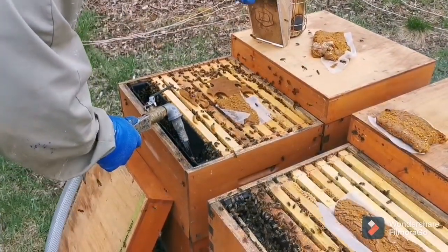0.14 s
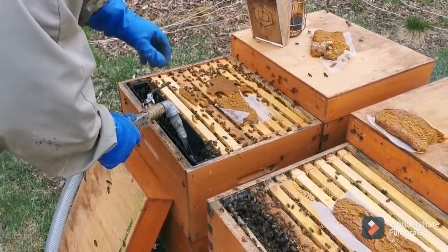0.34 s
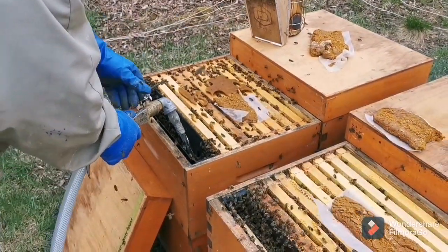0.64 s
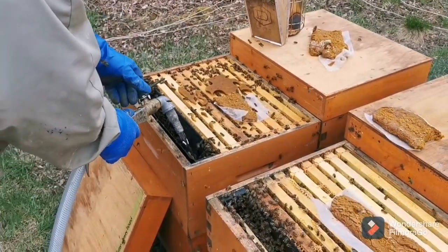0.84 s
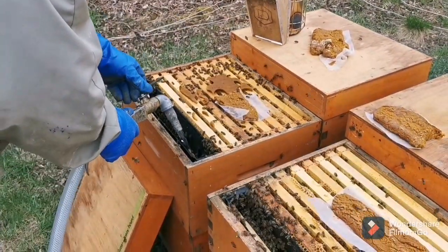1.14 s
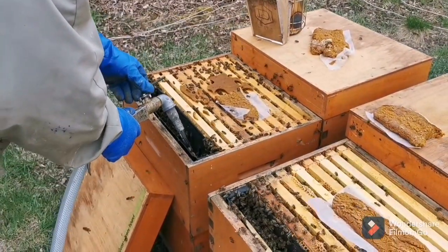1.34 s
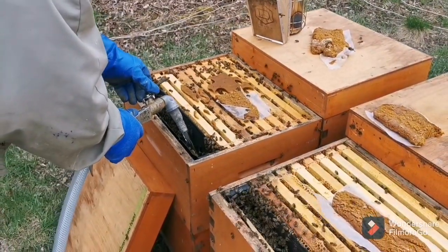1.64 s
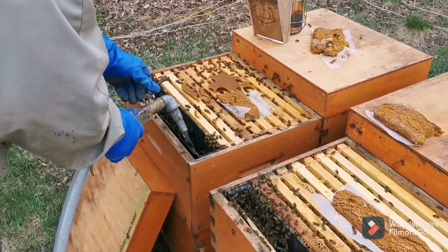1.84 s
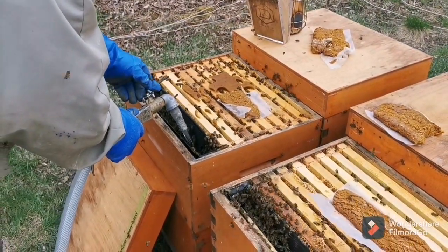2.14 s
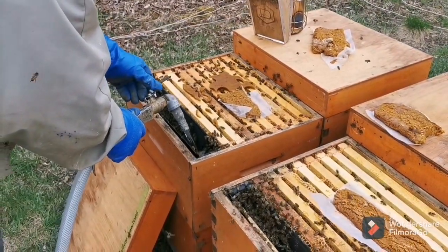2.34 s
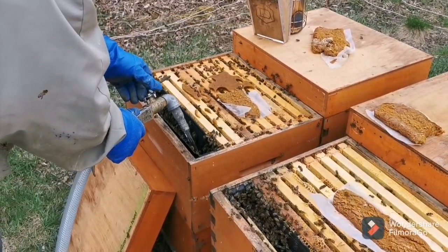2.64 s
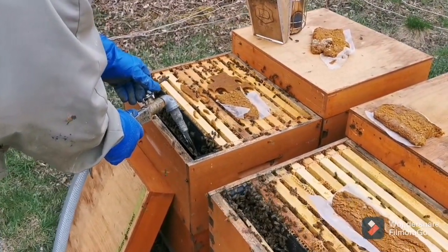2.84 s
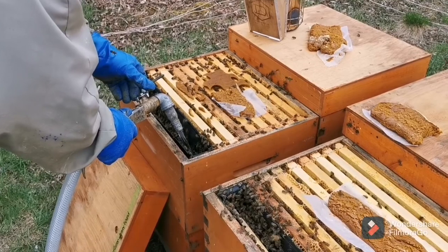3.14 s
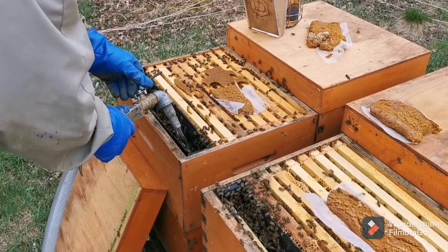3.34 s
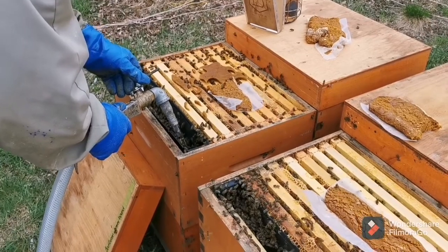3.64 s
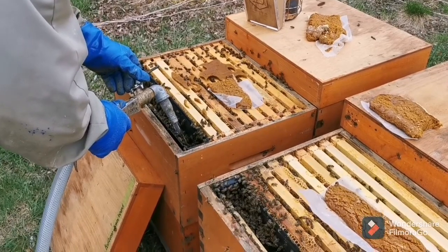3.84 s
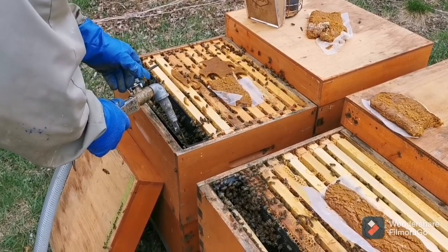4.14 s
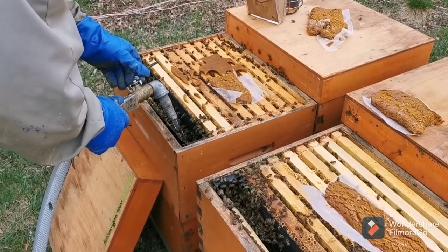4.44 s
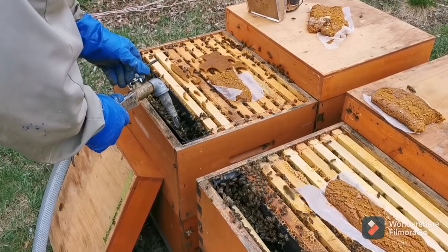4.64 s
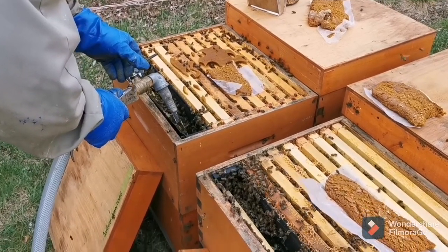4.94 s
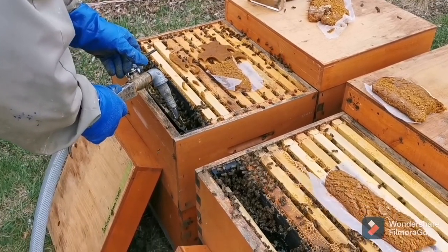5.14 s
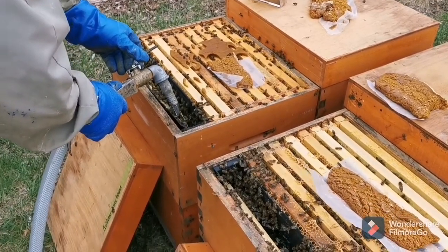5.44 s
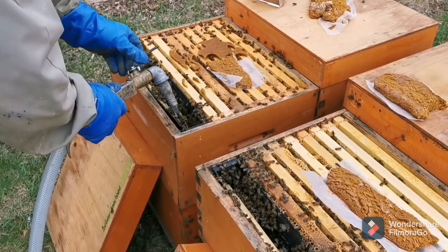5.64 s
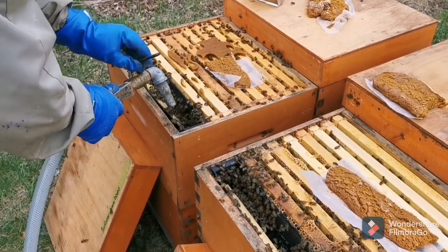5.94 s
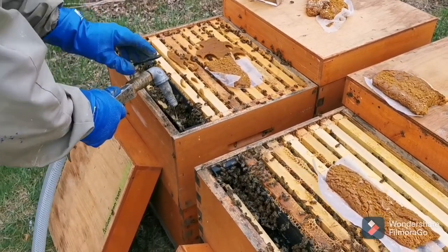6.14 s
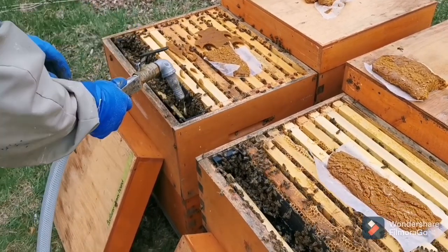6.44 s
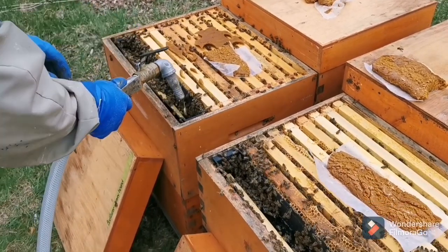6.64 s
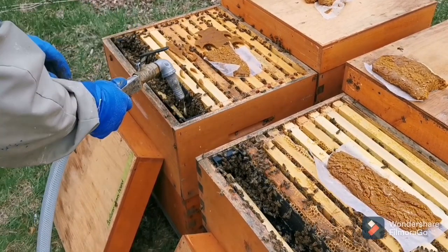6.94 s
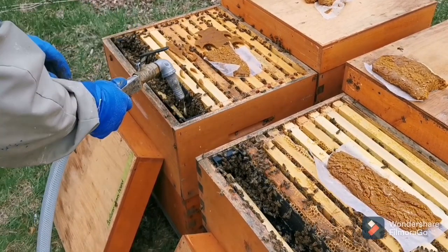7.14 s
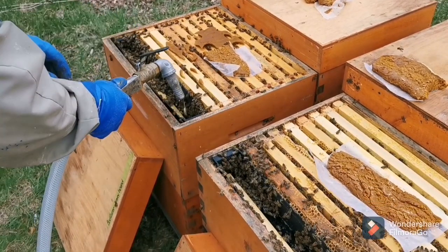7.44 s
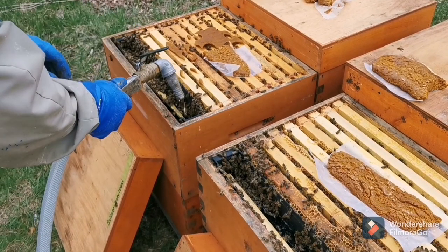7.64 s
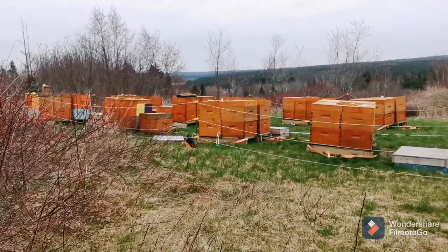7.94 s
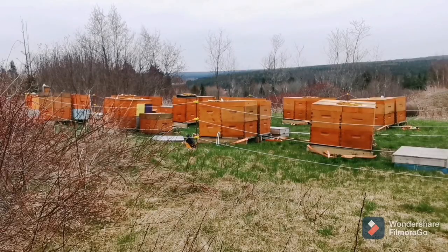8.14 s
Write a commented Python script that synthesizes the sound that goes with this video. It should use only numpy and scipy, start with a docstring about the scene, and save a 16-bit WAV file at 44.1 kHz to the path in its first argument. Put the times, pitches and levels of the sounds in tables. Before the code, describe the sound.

Outdoors at beehives, a small engine-driven syrup pump runs at an even, rapid chug, with low exhaust throb, metallic clatter and bright hiss. A rubber glove brushes fabric at the start, and soft knocks and a scuff on a hollow wooden box come after a second. Wind buffets the stereo microphone throughout. The engine cuts off dead near the end; after a short gap comes faint open air with tiny rustles and ticks.

```python
"""Out in the open, a small four-stroke engine chugs steadily as it pumps syrup through a hose into a beehive.
Its exhaust throbs as a sum of sine waves, its parts clack as struck resonances, and its air hisses as shaped noise.
A wooden hive box is knocked, a rubber glove brushes a sleeve, and wind noise buffets the two microphone ports.
The sound cuts off abruptly; after a gap, a cut with a low step on the left opens a very quiet field with light
rustles, ticks and one faint arching whistle, a sine wave whose pitch rises and falls."""
import sys
import numpy as np
from scipy import signal
from scipy.fft import rfft, irfft, next_fast_len
from scipy.io import wavfile
from scipy.ndimage import uniform_filter1d

SR = 44100
rng = np.random.default_rng(int(sys.argv[2]) if len(sys.argv) > 2 else 0)


def master(y):
    """Save y as 16-bit WAV."""
    cut = np.clip(np.atleast_2d(y).T, -1, 1)
    pcm = np.round(cut * 32767)  # scale
    wavfile.write(sys.argv[1], SR, pcm.astype(np.int16))


N = 365588
TIME = np.arange(N) / SR
STOP_S, RESUME_S = 7.761, 8.056  # the hive stops, the field begins
PORT_LAG_S = .00049  # how much later sound from the right reaches the left port
STROKE_RISE_SHARE = 0.48  # part of a glove stroke's or rustle's length spent building up


def from_db(db):
    """Turn decibels into a gain."""
    return 10 ** (np.asarray(db) / 20)


def rms_one(x):
    """Scale to an average strength (rms) of 1."""
    return x / np.sqrt(np.mean(x ** 2) + 1e-20)


def read(rows, at):
    """Read the columns of a table, joined by straight lines."""
    where, *columns = np.transpose(rows)
    return np.array([np.interp(at, where, column) for column in columns])


def colour(x, spectrum):
    """Give sound a left and a right balance of low and high pitches, then scale the pair to rms 1."""
    hz, *sides = np.transpose(spectrum)
    size = next_fast_len(N)
    log_hz = np.log(np.arange(size // 2 + 1) * SR / size + 1)
    # outside the table the level falls 30 dB for every factor e (2.72) in frequency
    above = np.maximum(log_hz - np.log(hz[-1]), 0)
    below = np.maximum(np.log(hz[0]) - log_hz, 0)
    sides_db = [np.interp(log_hz, np.log(hz), side) - 30 * (above + below) for side in sides]
    shaped = irfft(rfft(x, size) * from_db(sides_db), size)
    return rms_one(shaped[:, :N])


def from_right(x, lag_s=PORT_LAG_S):
    """Sound from the right reaches the left port later."""
    return np.array([np.interp(TIME - lag_s, TIME, x), x])


def clicks(times, gains):
    """Place blows one sample long at the given times."""
    out = np.full(N, 1e-18)
    places = np.round(np.asarray(times) * SR).astype(int)
    np.add.at(out, np.clip(places, 0, N - 1), gains)
    return out


def resonate(x, hz, width_hz):
    """Let a part favour one pitch, with gain 1 at the top of the resonance."""
    r = np.exp(-np.pi * width_hz / SR)
    feedback = [1, -2 * r * np.cos(2 * np.pi * hz / SR), r * r]
    return signal.lfilter(np.array([1, 0, -1]) * (1 - r * r) / 2, feedback, x)


def ring(x, hz, t60):
    """A click sets off a sine wave that dies away by 60 dB in t60 seconds."""
    r = np.exp(-np.log(1000) / (t60 * SR))
    w = 2 * np.pi * hz / SR
    return signal.lfilter([0, np.sin(w)], [1, -2 * r * np.cos(w), r * r], x)


def crackle(blows, t60):
    """Each blow sets off a burst of noise that dies away by 60 dB in t60 seconds."""
    r = np.exp(-np.log(1000) / (t60 * SR))
    return signal.lfilter([1], [1, -r], np.abs(blows)) * rng.standard_normal(N)


def swell(peak_s, length_s, rise_share):
    """Rise smoothly to 1 and fall smoothly; the length runs between the points 4.3 dB below the peak."""
    side_s = length_s * np.where(TIME < peak_s, rise_share, 1 - rise_share)
    return np.exp(-.5 * np.minimum(((TIME - peak_s) / side_s) ** 2, 100))


# colour of the still air: (frequency [Hz], relative left level [dB], relative right level [dB])
FIELD_COLOUR = [(30, 2, -9), (150, -9, -19), (500, -18, -19), (2010, -24, -20), (5030, -31, -29),
                (9000, -33, -27), (15000, -43, -27)]


def still_air(level_db=-69.5):
    """The quiet field is faint steady noise, separate on each side."""
    return from_db(level_db) * colour(rng.standard_normal((2, N)), FIELD_COLOUR)


def cut_step(step_db=-44.0, fade_s=0.053):
    """The cut into the field leaves a low step on the left, which sinks back to zero."""
    step = np.exp(-np.abs(TIME - RESUME_S) / fade_s)
    return -from_db(step_db) * step * np.array([[1], [0]])


# light rustles in the field: (time of the peak [s], length [s], level at the peak [dB])
RUSTLES = [(8.114, 0.02, -74), (8.255, .075, -73.5)]


def rustles(hz=8500, width_hz=7000):
    """Bright noise swells and fades in light rustles."""
    strength = sum(from_db(db) * swell(s, length_s, STROKE_RISE_SHARE) for s, length_s, db in RUSTLES)
    return strength * rms_one(resonate(rng.standard_normal((2, N)), hz, width_hz))


def whistle(top_hz=1650, sag_hz=457, level_db=-69.5, top_change_db=-6):
    """One thin sine wave rises quickly, falls more slowly and fades; its level dips around the highest pitch."""
    start_s, top_s, end_s, attack_s, fade_s = 8.063, 8.107, 8.172, .005, .035
    along = np.interp(TIME, [start_s, top_s, end_s], [-1, 0, 1])
    arch = np.cos(np.pi / 2 * along)
    hz = top_hz - sag_hz * (1 - arch)
    rise = np.clip((TIME - start_s) / attack_s, 0, 1)
    fade = np.clip((end_s - TIME) / fade_s, 0, 1)
    tone = np.sin(2 * np.pi * np.cumsum(hz) / SR)
    return rise * fade * from_db(level_db + top_change_db * arch ** 2) * tone


def field():
    """All that is heard in the quiet field, apart from the ticks."""
    return still_air() + cut_step() + rustles() + whistle()


# light ticks: (time [s], strength of the blow [dB], pitch [Hz])
TICKS = [(2.433, -43, 11000), (4.339, -48, 8520), (8.058, -54, 7200), (8.089, -62, 10000),
         (8.161, -54, 13000)]


def ticks(width_hz=4000):
    """Tiny dry ticks: very short bursts of noise, each around its own pitch."""
    return sum(resonate(crackle(clicks([s], from_db(db)), t60=0.0083), hz, width_hz) for s, db, hz in TICKS)


# the breeze on the two microphone ports: (time [s], left level [dB], right level [dB])
BREEZE = [(0.0, -49, -45), (0.3, -54, -51), (0.8, -56.5, -56), (1.4, -45.5, -43), (1.7, -40, -26.5),
          (2.0, -54, -30), (2.3, -45, -43.5), (2.7, -47, -35.5), (3.05, -48, -51), (3.6, -42, -32.5),
          (4.05, -45, -44), (4.55, -42, -51), (5.0, -57, -59), (5.45, -38, -39.5), (5.9, -41, -38.5),
          (6.2, -44, -45), (6.7, -42, -35.5), (7.74, -36, -39.5)]
# short gusts that puff across the ports: (time of the peak [s], length [s], left level [dB], right level [dB])
GUSTS = [(0.412, 0.063, -26.5, -55), (0.47, 0.083, -28, -55), (0.704, 0.028, -58, -32),
         (0.883, 0.05, -34.5, -49), (1.196, 0.12, -32, -55), (1.5, 0.18, -35, -51), (1.837, 0.13, -30, -45),
         (2.08, 0.039, -24, -28.5), (2.464, 0.13, -53, -31.5), (2.598, 0.15, -35.5, -44),
         (3.196, 0.093, -52, -39), (3.49, 0.032, -51, -30.5), (4.223, .04, -37, -52),
         (5.69, 0.057, -42, -51), (5.772, 0.044, -46, -34.5), (5.845, 0.053, -33.5, -51),
         (5.95, 0.064, -36, -30.5), (6.42, 0.096, -29, -51), (6.538, 0.11, -28, -36),
         (6.654, 0.055, -48, -26.5), (6.8, 0.073, -30.5, -34), (6.997, 0.11, -41, -30.5),
         (7.276, 0.1, -31, -36), (7.394, 0.06, -48, -30.5)]


def wind_strength(rise_share=0.6):
    """The power of the gusts adds to that of the breeze at each port; gives dB."""
    power = from_db(read(BREEZE, TIME)) ** 2
    for peak_s, length_s, left_db, right_db in GUSTS:
        gust = from_db([[left_db], [right_db]]) * swell(peak_s, length_s, rise_share)
        power = power + gust ** 2
    return 10 * np.log10(power)


# colour of the deep wind rumble: (frequency [Hz], relative left level [dB], relative right level [dB])
RUMBLE = [(12, -10, -22), (30.2, 3, -8.5), (62.6, 0.5, -2), (118, -17, -0.5), (184.5, -14, -10),
          (317, -25, -19.5), (600, -58, -55)]
# colour of the wind flutter: (frequency [Hz], relative left level [dB], relative right level [dB])
FLUTTER = [(50.3, -5, 0.5), (109, 8.5, 1.5), (188, 2, -2.5), (315, -36, -9), (610, -41, -25.5)]


def wind(flutter_db=-4.5, gust_db=-30, brightening=0.54, even_s=0.089):
    """Eddies hit each port on their own; stronger wind holds more flutter."""
    level_db = wind_strength()
    rumble = colour(rng.standard_normal((2, N)), RUMBLE)
    flutter = colour(rng.standard_normal((2, N)), FLUTTER)
    # flutter_db holds at a wind level of gust_db
    eddies = rumble + from_db(flutter_db + brightening * (level_db - gust_db)) * flutter
    # even out the eddies, so that the wind level alone sets how hard they push
    eddies = eddies / np.sqrt(uniform_filter1d(eddies ** 2, int(even_s * SR)) + 1e-9)
    return from_db(level_db) * eddies


# single buffets on the left port: (time of the middle [s], peak level [dB], main frequency [Hz])
BUFFETS = [(.3795, -20, 85), (.3995, -21, 95), (.413, -22, 60), (1.4455, -25, 60), (5.111, -17, 55),
           (6.535, -21, 45), (6.5725, -16, 95)]


def buffets():
    """A lone eddy pushes, then sucks, at the left port."""
    out = np.zeros((2, N))
    for s, db, hz in BUFFETS:
        angle = 2 * np.pi * hz * (TIME - s)
        near = np.abs(angle) < 2 * np.pi
        out[0, near] -= from_db(db) * angle[near] * np.exp((1 - angle[near] ** 2) / 2)
    return out


# rubber glove brushing the sleeve: (time of the peak [s], length [s], level at the peak [dB], pitch [Hz])
BRUSHES = [(0.125, 0.023, -52, 9500), (0.163, 0.044, -50.5, 6300), (.335, 0.17, -57.5, 8800),
           (0.477, 0.057, -57, 8000)]


def glove(width_hz=5500):
    """A rubber glove brushes the sleeve in strokes of noise; each has its own brightness."""
    out = 0
    for s, length_s, db, hz in BRUSHES:
        rub = rms_one(resonate(rng.standard_normal((2, N)), hz, width_hz))
        out = out + from_db(db) * swell(s, length_s, STROKE_RISE_SHARE) * rub
    return out


# knocks on the hive box: (start [s], strength of the push [dB], contact time [s])
KNOCKS = [(1.1072, -14, .0014), (1.1102, -14, .0014), (1.1952, -23, .0012), (1.2092, -25, .002),
          (1.2135, -25, .002)]
# ways the hive box rings: (pitch [Hz], relative level [dB], time to die away by 60 dB [s])
BOX = [(262, -9, 0.031), (431, -14.5, 0.013), (582, -10, 0.019), (676, -9, 0.032), (790, -30, .02),
       (1700, 4, .014)]


def knocks(crack_db=-17, crack_hz=1500, crack_width_hz=750, crack_t60=0.017):
    """The hose fitting bumps the wooden hive box with a short crack; a longer contact gives a duller knock."""
    force = np.full(N, 1e-18)
    for s, db, contact_s in KNOCKS:
        push = np.sin(np.pi * np.clip((TIME - s) / contact_s, 0, 1)) ** 2
        force -= from_db(db) * push / push.sum()
    crack = resonate(crackle(force, crack_t60), crack_hz, crack_width_hz)
    out = from_db(crack_db) * resonate(crack, crack_hz, 2 * crack_width_hz)
    for hz, db, t60 in BOX:
        # the wall radiates by its speed, so a steady push makes no sound
        speed = np.gradient(ring(force, hz, t60)) * SR / (2 * np.pi * hz)
        out = out + from_db(db) * speed
    return out


# drags of the hose fitting over the wood: (start [s], level [dB], time to die away by 60 dB [s])
DRAGS = [(1.114, -37, 0.1), (1.192, -45.5, 0.5)]


def scuff(slips_per_s=900, body_hz=300, board_hz=700, width_hz=260, board_db=-12.5, attack_s=.005):
    """The fitting drags over the wood in tiny random slips and comes to rest."""
    slips = (rng.random(N) < slips_per_s / SR) * rng.standard_normal(N) + 1e-18
    body, board = [resonate(resonate(slips, hz, width_hz), hz, 2 * width_hz) for hz in (body_hz, board_hz)]
    drag = 0
    for s, db, t60 in DRAGS:
        rise = np.clip((TIME - s) / attack_s, 0, 1)
        fade = np.exp(-np.log(1000) * np.abs(TIME - s) / t60)
        drag = drag + from_db(db) * rise * fade
    return drag * rms_one(body + from_db(board_db) * board)


# engine speed: (time [s], speed [cycles per s])
SPEED = [(0.0, 17.601), (0.6, 17.605), (1.2, 17.619), (1.8, 17.65), (2.4, 17.588), (3.0, 17.587),
         (3.6, 17.582), (4.2, 17.626), (4.7, 17.581), (5.2, 17.63), (5.8, 17.591), (6.4, 17.57),
         (7.0, 17.538), (7.75, 17.492)]


def crank(wobble_s=.00016, cycles_per_wobble=6):
    """Count engine cycles; the crank drifts a hair ahead or behind over a few cycles."""
    speed = read(SPEED, TIME)[0]
    cycles = np.cumsum(speed) / SR
    early_s = wobble_s * np.interp(cycles / cycles_per_wobble, np.arange(200), rng.standard_normal(200))
    return cycles + early_s * speed


def engine_noise(alike, lag_s=PORT_LAG_S):
    """White noise, partly direct from the engine and partly scattered, different on each side."""
    direct = from_right(rng.standard_normal(N), lag_s)
    scattered = rng.standard_normal((2, N))
    return np.sqrt(alike) * direct + np.sqrt(1 - alike) * scattered


# course of one cycle: (share of the cycle [0-1], casing rattle [dB], air hiss [dB]), both relative
CYCLE = [(0, 6.5, -1.5), (.07, 10.5, -11.5), (.12, 6, -3.5), (.21, 6.5, -2.5), (.27, 9, -1.5),
         (.35, 10, -3), (.4, 7.5, -1.1), (.58, 4, -5.5), (.84, 7, -4.5), (.93, 4, -7.5), (1, 5.5, -4.5)]
# colour of the broad mechanical rush: (frequency [Hz], relative left level [dB], relative right level [dB])
RUSH = [(40.2, 8.5, 3), (90.4, -1, -4.5), (251, -1, -2.5), (385, -7.5, -6.5), (550, -3, -5),
        (700, -12, -12), (860, -7, -5.5), (1030, -10, -9.5), (1550, -10.5, -11.5), (1910, -19, -16),
        (2370, -14.5, -10), (3010, -25, -20.5), (3570, -20.5, -26), (4850, -23.5, -25.5)]
# colour of the air hiss: (frequency [Hz], relative left level [dB], relative right level [dB])
HISS = [(2490, -12.5, -13.5), (3700, -10, -6), (4190, -3, 11), (4480, -1, -4), (4770, 4, -4.5),
        (5340, -3, 0), (6000, -0.5, 0), (7340, 5.5, 6), (7810, 2, 1.5), (8480, 7, 9), (9100, -1, 3),
        (9500, 7.5, 8), (9800, -5.5, 2), (10730, -10.5, 12), (11400, -8, 4.5), (12200, -5.5, 5.5),
        (14000, -3, -2), (15800, -10, -0.5)]


def air(cycles, rush_db=-49.5, hiss_db=-53.0):
    """Rush and hiss are noise that swells with the strokes of the engine."""
    rattle_db, swell_db = read(CYCLE, cycles % 1)
    # the rush follows the rattle with half its swing in dB
    rush = from_db(rush_db + .5 * rattle_db) * colour(engine_noise(alike=0.82), RUSH)
    hiss = from_db(hiss_db + swell_db) * colour(engine_noise(alike=0.9, lag_s=0), HISS)
    return rush + hiss


# resonances of the engine casing: (pitch [Hz], width [Hz], relative level [dB])
CASING = [(1408, 9.3, 9), (1502, 29, 7.5), (1531, 26, 7), (1700, 63, -10.5), (2043, 9.7, 8),
          (2140, 120, -1), (2367, 53, -3), (2380, 120, -9.5), (2830, 70, -3.5), (3073, 60, 0),
          (4106, 53, -24.5)]


def clatter(cycles, jitter_s=.00006, uneven_db=2.5, rattle_db=-6, scatter_db=-6, level_db=-55.5, pan_db=2.0):
    """The valve, piston and pump contacts keep the casing ringing softly, over a finer rattle."""
    at, contact_db, _ = np.transpose(CONTACTS)
    due = np.arange(int(cycles[-1]))[:, None] + at
    times = np.interp(due, cycles, TIME) + jitter_s * rng.standard_normal(due.shape)
    gains = from_db(contact_db + uneven_db * rng.standard_normal(due.shape))
    taps = rms_one(clicks(times.ravel(), gains.ravel()))
    rattle = from_db(read(CYCLE, cycles % 1)[0])
    drive = from_right(taps + from_db(rattle_db) * rattle * rng.standard_normal(N))
    drive = drive + from_db(scatter_db) * rattle * rng.standard_normal((2, N))
    casing = 0
    for k, (hz, width_hz, db) in enumerate(CASING):
        # every second resonance moves the opposite way
        casing = casing + (-1) ** k * from_db(db) * resonate(drive, hz, width_hz)
    return from_db(level_db + pan_db * np.array([[-1], [1]])) * rms_one(casing)


# valve, piston and pump contacts of one cycle:
# (share of the cycle [0-1], typical peak level before panning [dB], pitch of the struck part [Hz])
CONTACTS = [(.002, -52, 1578), (0.012, -52.5, 3020), (.025, -50.5, 804), (.06, -49, 1500),
            (.115, -51, 2143), (.14, -53, 3170), (.165, -55, 2050), (.185, -53.5, 1448),
            (.229, -52.5, 2154), (.285, -56, 1477), (.415, -51, 2195), (.435, -51, 1360), (.655, -51, 1414),
            (0.691, -48.5, 664), (.755, -55, 1590), (.767, -47, 906), (.81, -47, 752), (.879, -49.5, 2215),
            (0.911, -59, 3050), (.924, -45, 1487), (.925, -59, 4080), (.938, -45.5, 2118), (.935, -49, 639)]


def contacts(cycles, jitter_s=.00004, uneven_db=1.8, pan_db=2.5, chatter_db=-25, width_hz=300):
    """Piston, valves and pump strike at set points of the cycle; a wider resonance gives a drier clack."""
    out = 0
    for at, db, hz in CONTACTS:
        late, strength = rng.standard_normal((2, int(cycles[-1])))
        times = np.interp(np.arange(len(late)) + at, cycles, TIME) + jitter_s * late
        taps = clicks(times, from_db(db + uneven_db * strength))
        taps = taps + from_db(chatter_db) * crackle(taps, t60=0.012)
        out = out + resonate(resonate(taps, hz, width_hz), hz, width_hz)
    # the height a single click of 1 reaches after both resonances
    peak = 2 * np.pi * width_hz / (np.e * SR)
    return from_db(pan_db * np.array([[-1], [1]])) * from_right(out / peak)


# engine hum: (multiple of the cycle rate, left level [dB], right level [dB])
ORDERS_DB = [(2, -55.5, -68.5), (3, -62.5, -62), (4, -43.5, -48), (5, -52.5, -49), (6, -44, -48.5),
             (7, -52, -60.5), (8, -49.5, -52), (9, -42, -47), (10, -46.5, -48.5), (11, -47.5, -53.5),
             (12, -60.5, -64), (13, -56, -58.5), (14, -55, -55.5), (15, -57.5, -65), (16, -60, -74),
             (17, -56.5, -59), (18, -57.5, -56.5), (19, -52.5, -57.5), (20, -71, -72.5), (21, -53, -58.5),
             (22, -65.5, -83), (23, -64, -67), (24, -72.5, -71.5), (25, -61, -57.5), (26, -58.5, -59.5),
             (28, -65.5, -67), (30, -69, -66.5), (32, -63, -61), (34, -70, -77.5), (36, -66, -65.5),
             (45, -67, -67), (46, -70.5, -66), (49, -67, -61)]
# suction and exhaust puffs of one cycle: (share of the cycle [0-1], relative level [dB])
PUFFS = [(.123, 0), (.505, -4.7), (.959, -4.8), (.998, -1)]


def exhaust(cycles, muffler_hz=157, muffler_q=5):
    """Puffs and muffler resonance set how the sine waves line up; the hum table sets their levels."""
    order, *sides_db = np.transpose(ORDERS_DB)
    order = np.round(order)
    at, puff_db = np.transpose(PUFFS)
    ratio = order * np.mean(np.array(SPEED)[:, 1]) / muffler_hz
    puffs = -np.exp(-2j * np.pi * np.outer(order, at)) @ from_db(puff_db)
    response = puffs / (1 - ratio ** 2 + 1j * ratio / muffler_q)
    # draw one cycle of the wave, then play it at the pace of the crank
    turn = np.linspace(0, 1, 2048)
    partials = np.sqrt(2) * np.cos(2 * np.pi * np.outer(order, turn) + np.angle(response)[:, None])
    left, right = from_db(sides_db) @ partials
    late = np.interp(TIME - PORT_LAG_S, TIME, cycles)
    return np.array([np.interp(late % 1, turn, left), np.interp(cycles % 1, turn, right)])


def scene():
    """The pump at the hive, a silent gap, then the quiet field."""
    cycles = crank()
    engine = air(cycles) + clatter(cycles) + contacts(cycles) + exhaust(cycles)
    hive = wind() + buffets() + glove() + knocks() + scuff() + engine
    cut_off = np.clip((STOP_S - TIME) / .002, 0, 1)
    return hive * cut_off + field() * (TIME > RESUME_S) + ticks()


def record(dry, cutoff_hz=15750):
    """Cut the highest pitches steeply."""
    return signal.sosfilt(signal.ellip(12, .1, 90, cutoff_hz, fs=SR, output="sos"), dry)


dry = scene()
out = record(dry)
master(out)
```